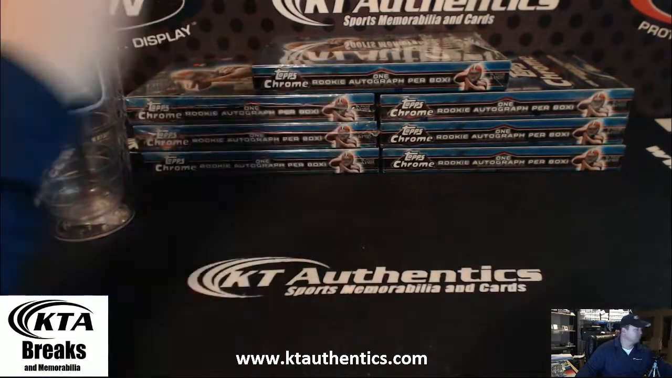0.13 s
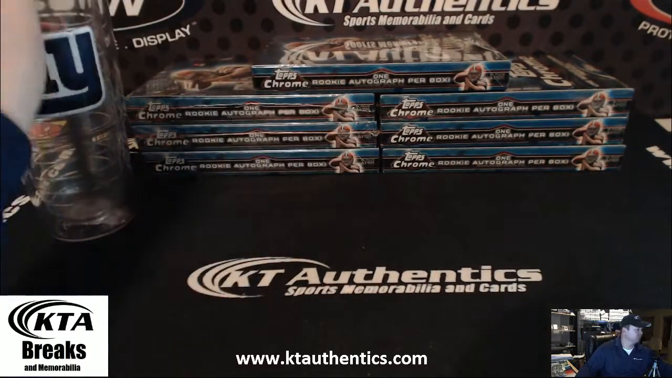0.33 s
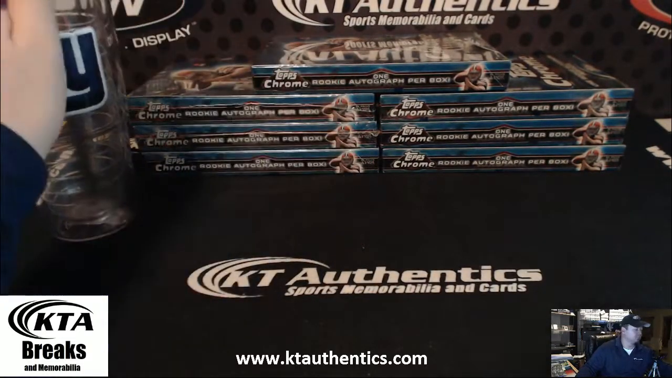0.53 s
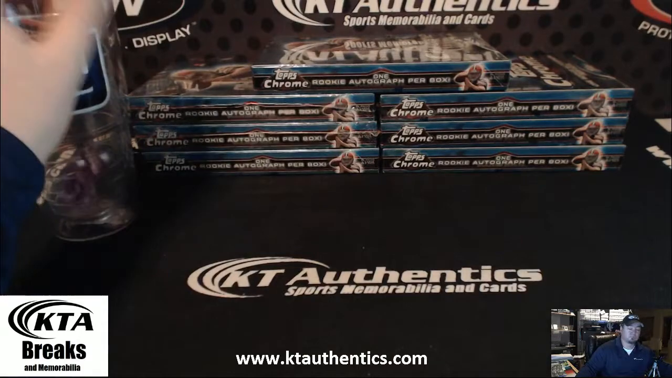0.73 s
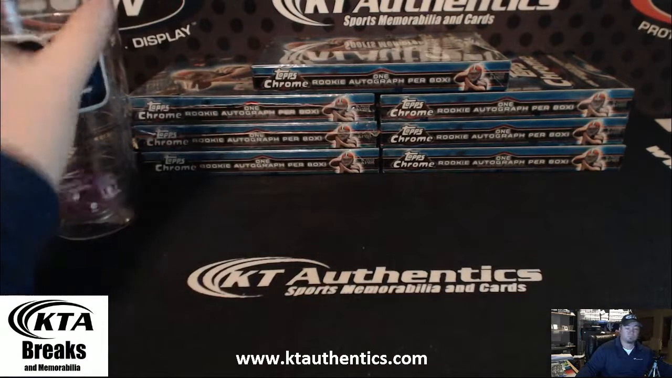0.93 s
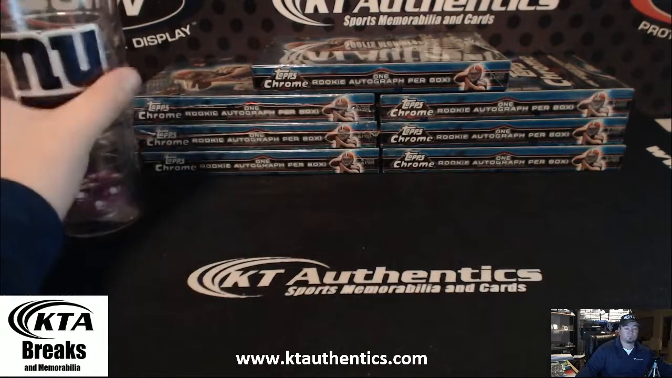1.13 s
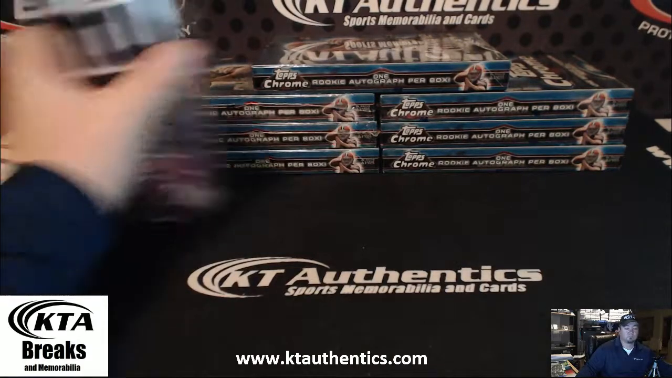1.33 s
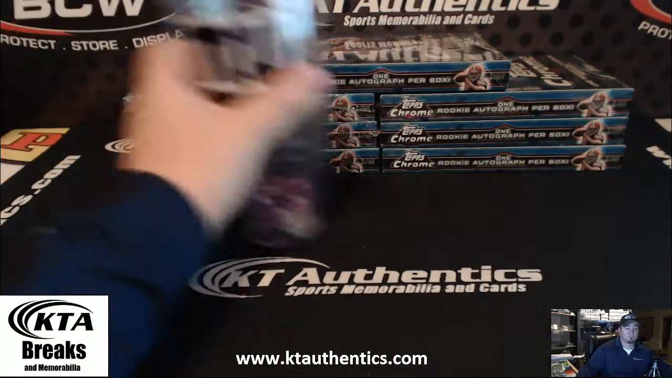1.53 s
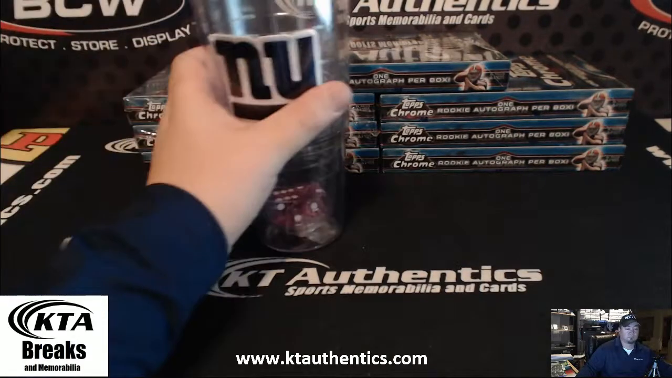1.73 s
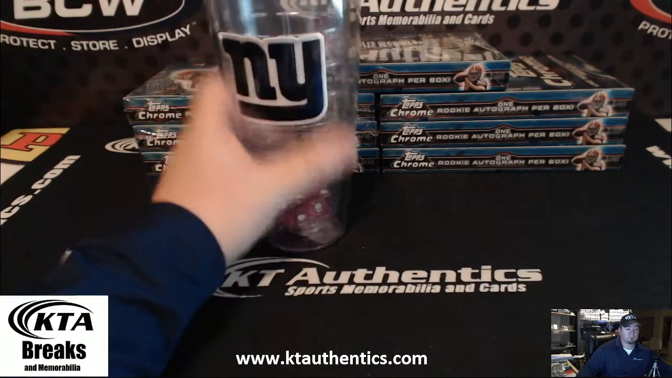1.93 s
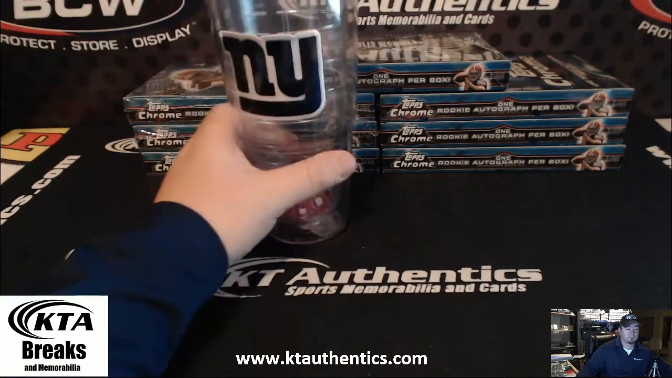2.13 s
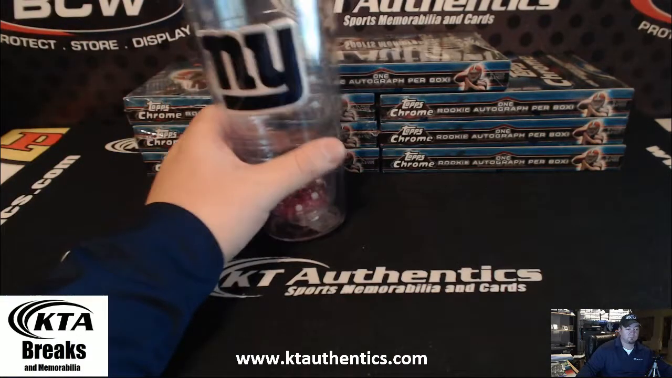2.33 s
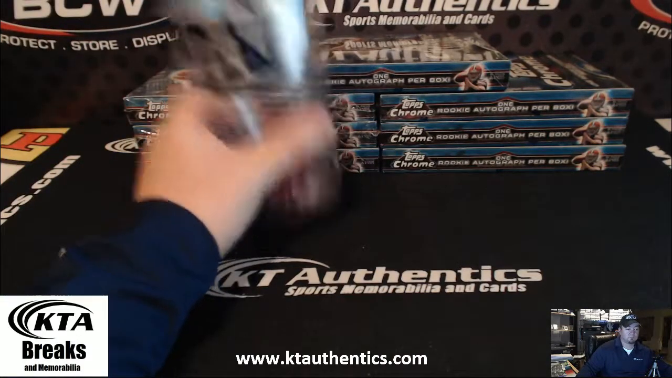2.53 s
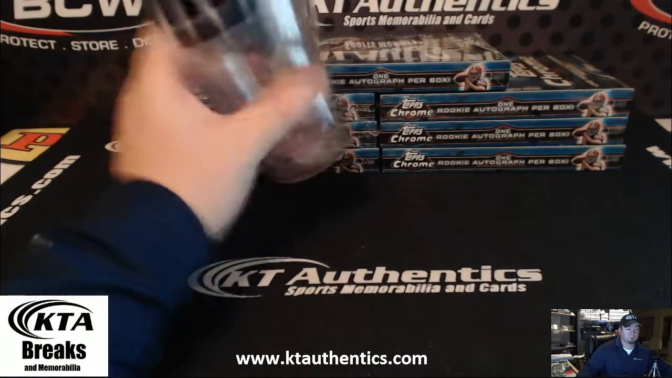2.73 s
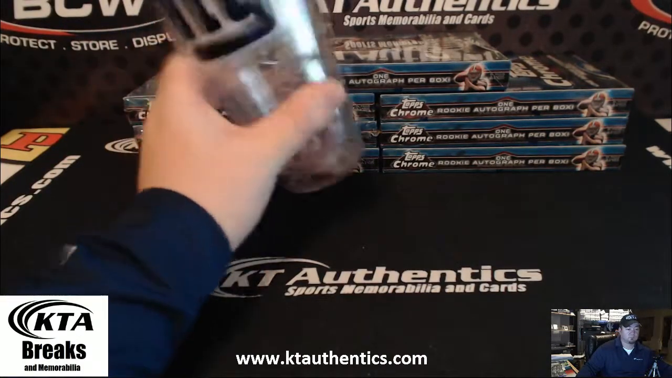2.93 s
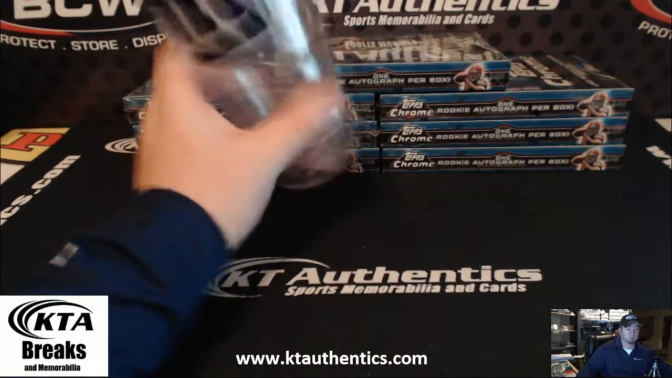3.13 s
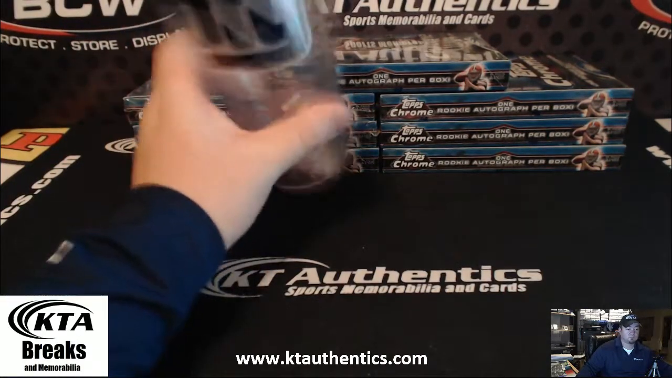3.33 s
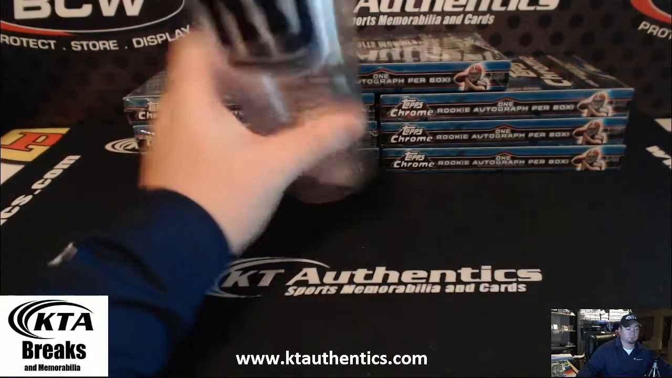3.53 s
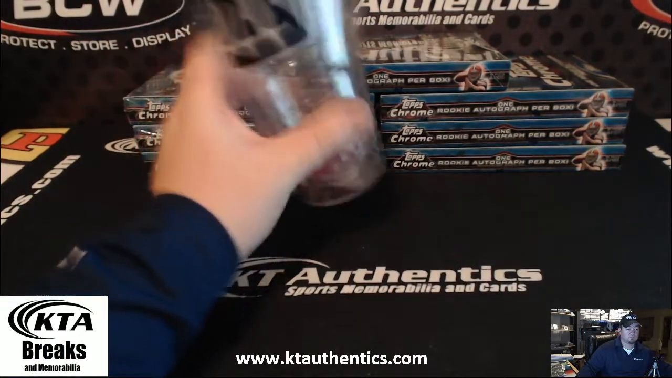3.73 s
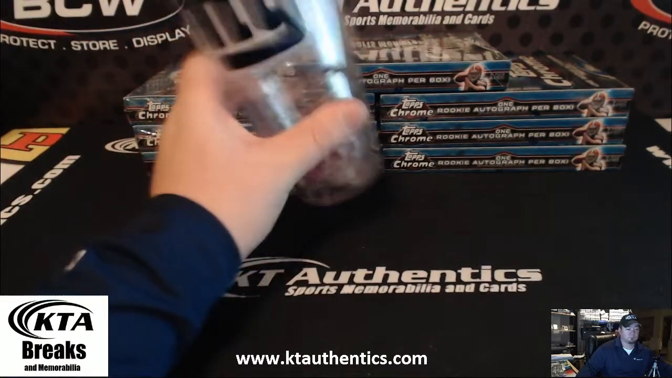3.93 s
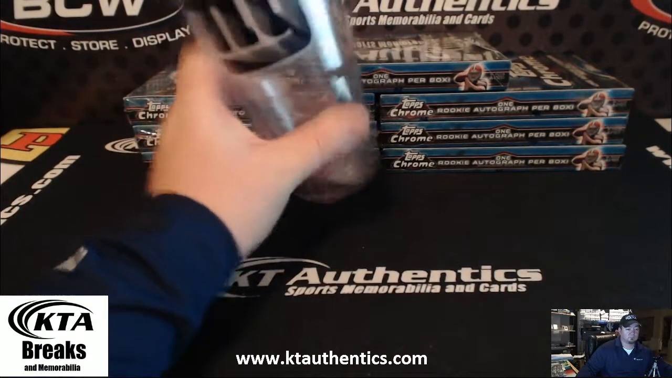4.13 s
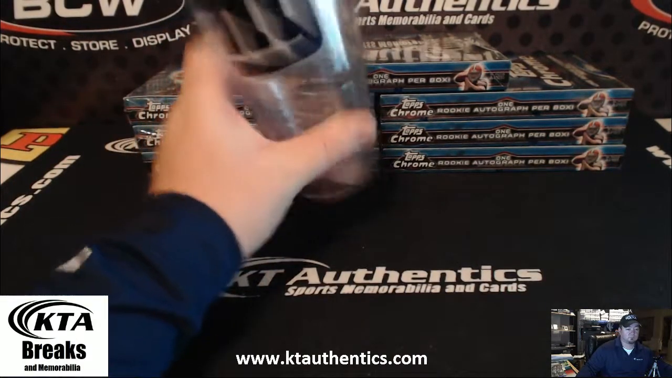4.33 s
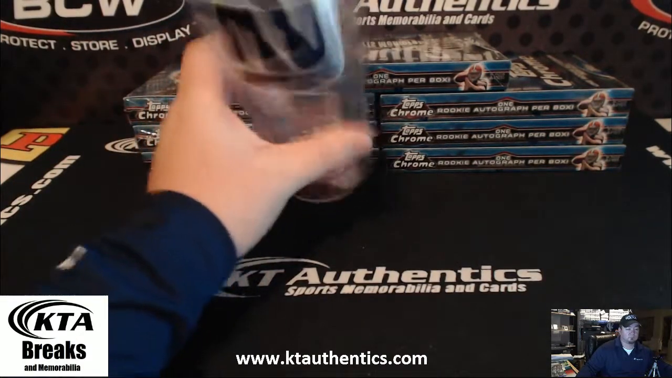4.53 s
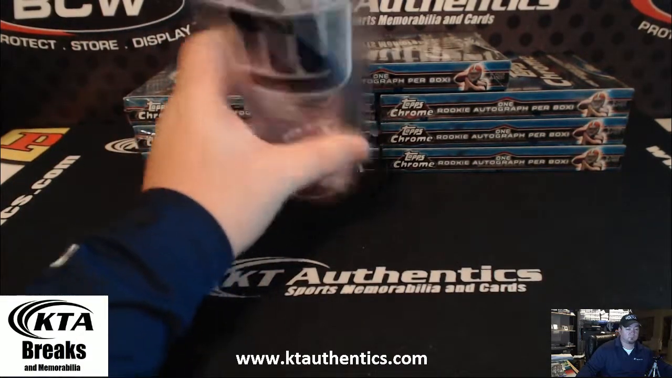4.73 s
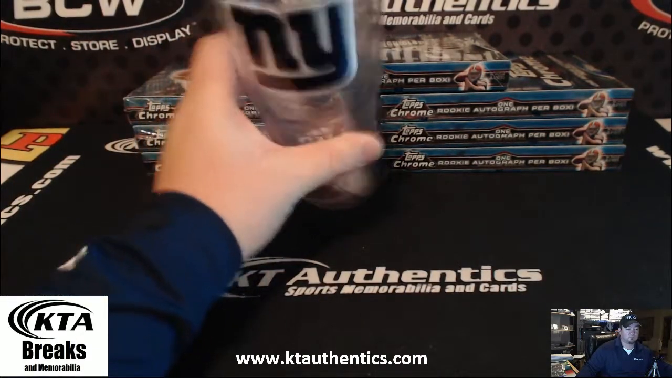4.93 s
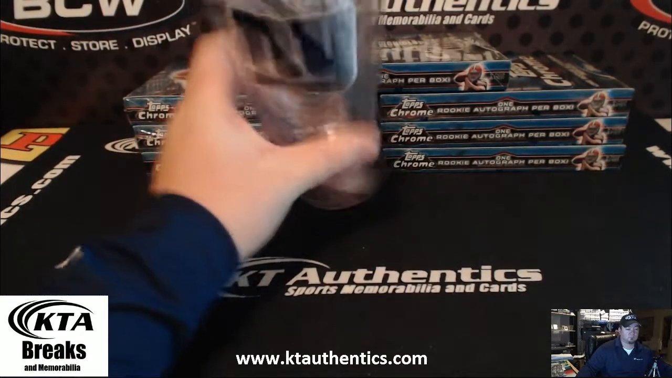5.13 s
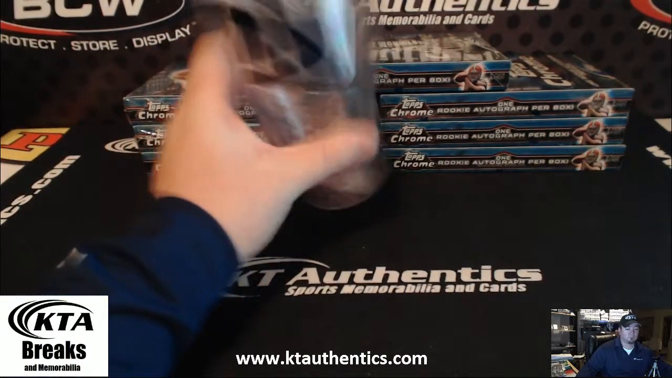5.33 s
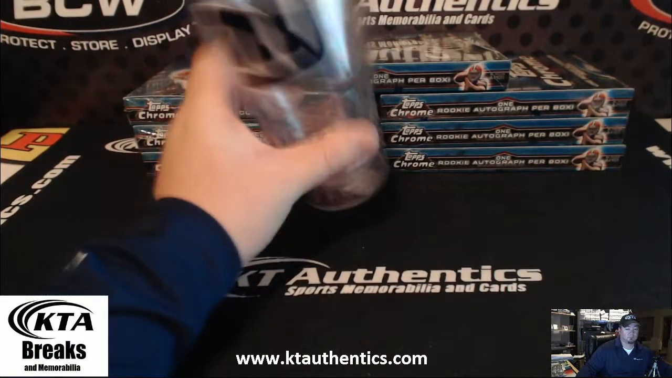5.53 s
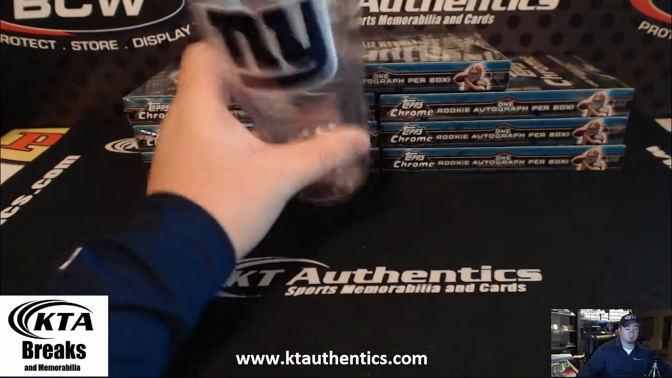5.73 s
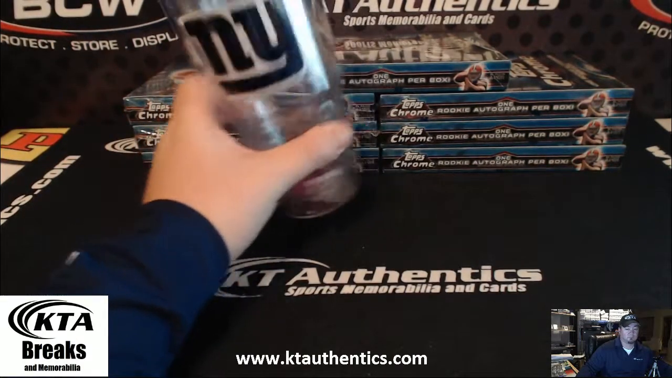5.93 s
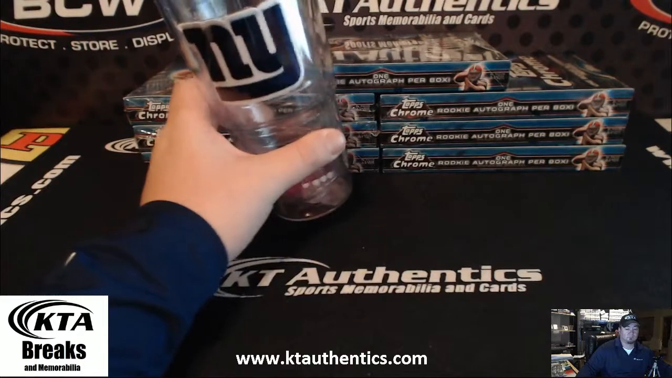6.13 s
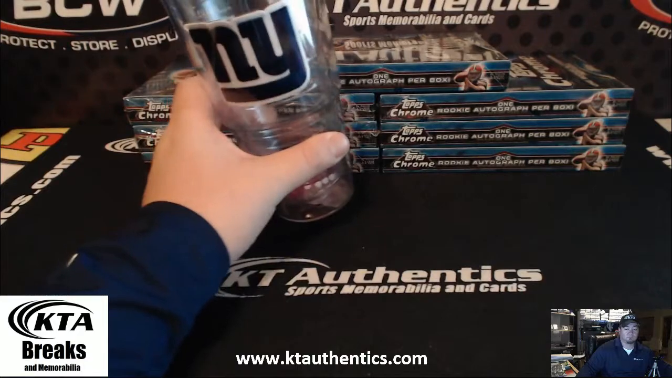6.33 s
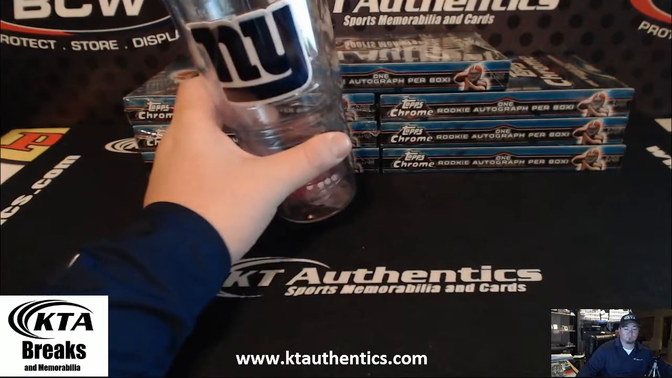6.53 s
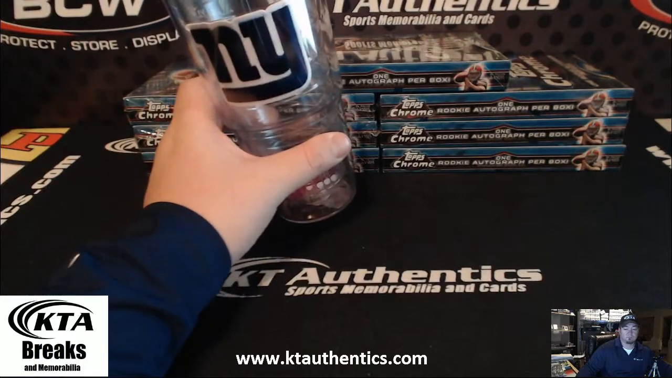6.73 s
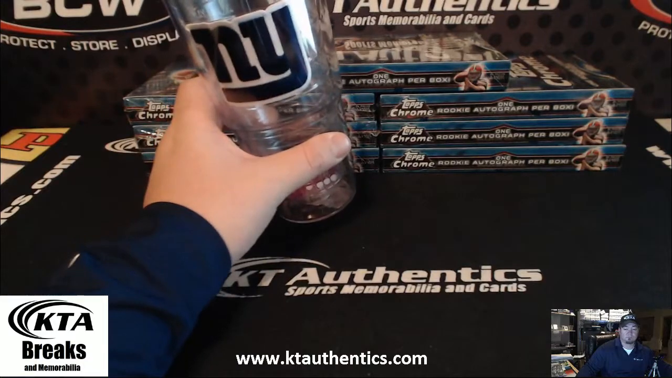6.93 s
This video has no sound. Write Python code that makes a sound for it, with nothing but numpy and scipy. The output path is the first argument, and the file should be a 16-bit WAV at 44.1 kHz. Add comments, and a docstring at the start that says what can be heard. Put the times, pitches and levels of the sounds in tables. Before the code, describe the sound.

In a small room, close to the microphone, dice land sharply in a plastic cup on a table and bounce to rest. A dull, deep bump follows. Then the dice are shaken in the cup, a fast, uneven rattle of hollow knocks and bright clicks over soft table thumps. It is strongest at first and ends after about three seconds, leaving faint hiss and hum.

```python
"""Dice in a plastic tumbler.

Dice drop into a stiff tumbler standing on a table, bounce and settle; then it is shaken hard for
three seconds. Each contact rings modes of the base, the wall and the dice. The table booms softly
under the arm, a small room rings behind, and the nearby microphone clips on the hardest hits."""
import sys
import numpy as np
from scipy import signal
from scipy.fft import rfft, irfft, next_fast_len
from scipy.io import wavfile

SR = 44100
rng = np.random.default_rng(int(sys.argv[2]) if len(sys.argv) > 2 else 0)


def inscribe(sig):
    """Save sig as 16-bit PCM at rate SR to the path in sys.argv[1].

    A 1-D sig is mono; a 2-D sig holds one channel per row.
    Samples are clipped to [-1, 1] before scaling.
    """
    pcm = np.round(np.clip(np.atleast_2d(sig).T, -1, 1) * 32767)
    wavfile.write(sys.argv[1], SR, pcm.astype(np.int16))


N = 308259
CARRY_S = 1.499  # tumbler brought across, between drop and shake

# dice landing in the standing tumbler: (time [s], level [dB], wall over base [dB])
LANDINGS = [(.337, -30.5, -3), (.382, -26, 1.5), (0.427, -31, 1), (.487, -6, 20), (.504, -7, -4.5),
            (.524, -6, 17.5), (.544, -13, -13.5), (.582, -16.5, -3.5), (.618, -12, 18), (.656, -11, 9),
            (0.679, -15.5, -2), (.711, -22.5, -3), (.735, -9, 11), (.755, -16.5, -3), (.810, -17, 2.5),
            (.881, -29.5, 3)]
# heap hitting the shaken tumbler as the hand turns: (time [s], level [dB], wall over base [dB])
HEAP_HITS = [(2.575, -27.5, -4), (2.635, -25, -8), (2.65, -9, 4.5), (2.737, -15.5, 1), (2.807, -10.5, 1),
             (2.88, -25, -15), (2.894, -13.5, -8), (2.93, -18.5, 8), (2.953, -15.5, 10), (2.972, -19.5, -8),
             (3.055, -13.5, -4), (3.122, -15.5, 3), (3.226, -13, 2), (3.285, -13.5, 8.5),
             (3.377, -15, -5.5), (3.454, -20, -1), (3.47, -11, 3.5), (3.553, -15, -3), (3.636, -12.5, 1.5),
             (3.715, -14.5, -3.5), (3.808, -14, 3.5), (3.82, -28, -3), (3.91, -17, -5), (3.976, -14.5, 2.5),
             (4.074, -19, -6), (4.167, -17.5, -6), (4.333, -20.5, -2), (4.452, -22, -5), (4.521, -18, -1),
             (4.589, -20.5, -6), (4.625, -19, -4), (4.703, -16.5, -3), (4.802, -22.5, -8),
             (4.898, -18, -5.5), (4.967, -20.5, -3), (5.063, -21.5, 5), (5.155, -21.5, -6),
             (5.249, -12.5, -3), (5.348, -22, -10), (5.368, -19.5, -11), (5.435, -28, 12), (5.534, -24, -8),
             (5.555, -22, -6), (5.652, -24, 0)]
# die against die: (time [s], level [dB], edge crack over clack [dB])
DIE_HITS = [(.337, -46.5, -1), (.382, -28.5, -1.5), (0.424, -34, -11), (.487, -4, -4), (0.522, -8.5, -17),
            (.618, -21, -19), (0.811, -27, -12.5), (2.554, -26.5, -9.5), (2.575, -28, -8),
            (2.737, -21.5, -3), (2.808, -16.5, -19), (2.82, -26.5, 4), (2.895, -26.5, 5),
            (2.971, -24.5, 2.5), (3.21, -23, -19), (3.285, -22, -21), (3.313, -18.5, 0),
            (3.392, -16.5, -18), (3.563, -24.5, 4), (3.91, -29.5, 9.5), (3.945, -23, -11),
            (4.048, -27, -13), (4.074, -36.5, 6), (4.676, -20.5, -16), (4.768, -25, -25),
            (4.803, -39.5, 13.5), (5.003, -31, -12), (5.208, -25, -13), (5.4, -16, -14),
            (5.435, -26.5, -11), (5.604, -22.5, -18)]
# a die rolling along the wall: (start [s], end [s], level [dB])
ROLLS = [(4.216, 4.335, -36.5), (4.459, 4.505, -35), (4.975, 5.07, -32), (5.409, 5.47, -35),
         (5.557, 5.6, -31.5)]
# vigour of the shaking: (time [s], level [dB])
EFFORT = [(2.65, -0.5), (3.6, 1.5), (4.0, -3.5), (4.25, -6), (4.7, -2.5), (5.62, -3.5)]
# arm's push on the table: (time [s], level [dB])
ARM_WEIGHT = [(2.86, -29), (3.2, -31.5), (3.88, -30.5), (4.1, -39), (4.4, -36.5), (4.76, -27.5), (5.1, -31),
              (6.0, -32.5)]
# tumbler base: (frequency [Hz], level [dB], t60 [s])
BASE_MODES = [(285, -3, 0.01), (377.6, 1.5, 0.068), (523, -3.5, 0.063), (720, -2.5, 0.01)]
# tumbler wall: (frequency [Hz], level [dB], t60 [s])
WALL_MODES = [(1228, 0.5, 0.013), (1318.4, 1.5, 0.056), (1522, -4.5, 0.014), (1845, -7, 0.025)]
# body of a die: (frequency [Hz], level [dB], t60 [s])
CLACK_MODES = [(2775, 6.45, 0.0078), (3414, 2.05, 0.01), (4410, 7.4, 0.0058)]
# hard edges of a die: (frequency [Hz], level [dB], t60 [s])
CRACK_MODES = [(5725, 0, 0.0074), (6610, 3, 0.0034), (8130, -3.5, 0.0015), (12400, -12.5, 0.0013)]
# table top: (frequency [Hz], level [dB], t60 [s])
TABLE_MODES = [(73.34, 3, 0.56), (90.3, -8.5, 0.32), (108.1, -1, 0.29)]
# room reverberation: (band centre [Hz], level [dB], t60 [s])
REVERB_BANDS = [(150, -5, 0.36), (507, -3, 0.5), (1400, -4, 0.57), (5960, -5, 0.54), (13000, 0.5, 0.35)]
# background noise: (frequency [Hz], relative density [dB])
ROOM_TONE_SPECTRUM = [(30, -1), (70, -1), (120, 0.5), (200, -7), (450, -11.5), (750, -9.5), (950, -17.5),
                      (2200, -22), (3300, -34.5), (9000, -35.5), (11000, -42), (16000, -47)]


def shake(edge_db_per_db=1.5):
    """Dice thrown about the shaken tumbler; edges crack more sharply with effort."""
    hit_effort_db = effort_db(np.array(HEAP_HITS)[:, 0])
    main = knocks(HEAP_HITS, clack_db=-14.5, crack_db=-15.5 + edge_db_per_db * hit_effort_db)
    leaders = neighbours(main, -0.0083, -0.00196, softer_db=-11.5, spread_db=0.0, count=1)
    # followers hit other dice more than the tumbler
    followers = neighbours(main, .005, .024, softer_db=[-14.0, -12.5, -7.5, -6.0], spread_db=3.5, count=2)
    meetings = clacks([row for row in DIE_HITS if row[0] > CARRY_S], base_db=-2.5, wall_db=0.0)
    loose = tumbling(levels_db=[-27.5, -26.0, -39, -48.5], effort_db_per_db=[0.42, 0.95, 0.59, 0.89])
    rolls = clacks(rolling(), base_db=-0.5, wall_db=0.5)
    hits = np.vstack([main, leaders, followers, meetings, loose, rolls])
    return dice(hits, WALL_MODES, wall_chatter=1.0, wall_top_hz=2240)


def drop(side_modes_db=-13.0):
    """Dice land in the tumbler; standing free, its wall rings mostly in the main mode."""
    strongest_db = max(db for hz, db, t60 in WALL_MODES)
    wall_modes = [(hz, db + side_modes_db * (db < strongest_db), t60) for hz, db, t60 in WALL_MODES]
    landings = knocks(LANDINGS, clack_db=-17.5, crack_db=-23)
    meetings = clacks([row for row in DIE_HITS if row[0] < CARRY_S], base_db=-12, wall_db=-16)
    return dice(np.vstack([landings, meetings]), wall_modes, wall_chatter=0.026, wall_top_hz=1870)


def knocks(rows, clack_db, crack_db):
    """Die on tumbler: the landing spot divides the blow between base and wall. Returns hits."""
    s, db, tilt_db = np.transpose(rows)
    return np.column_stack([s, db - tilt_db / 2, db + tilt_db / 2, db + clack_db, db + crack_db])


def clacks(rows, base_db, wall_db):
    """Die on die: part of the blow passes to the tumbler. Returns hits."""
    s, db, edge_db = np.transpose(rows)
    return np.column_stack([s, db + base_db, db + wall_db, db, db + edge_db])


def neighbours(hits, earliest_s, latest_s, softer_db, spread_db, count):
    """The heap is loose: softer hits land around each main one."""
    others = np.repeat(hits, count, axis=0)
    others[:, 0] += rng.uniform(earliest_s, latest_s, len(others))
    others[:, 1:] += np.array(softer_db) + spread_db * rng.standard_normal(others[:, 1:].shape)
    return others


def tumbling(levels_db, effort_db_per_db, per_s=60, spread_db=1.5, flight_s=.03, flight_db=-1.5):
    """Light hits that rise with effort and dip before each main blow, when most dice are airborne."""
    s = np.arange(EFFORT[0][0], EFFORT[-1][0], 1 / per_s)
    s = s + rng.uniform(0, 1 / per_s, len(s))
    wait_s = np.array(HEAP_HITS)[:, 0] - s[:, None]
    in_air = ((wait_s > 0) & (wait_s < flight_s)).any(axis=1, keepdims=True)
    db = np.array(levels_db) + np.outer(effort_db(s), effort_db_per_db) + flight_db * in_air
    return np.column_stack([s, db + spread_db * rng.standard_normal(db.shape)])


def rolling(ticks_per_s=66, edge_db=-19, spread_db=1.0):
    """A rolling die ticks once per face. Columns as DIE_HITS."""
    return [(s + rng.uniform(0, .5) / ticks_per_s, db + spread_db * rng.normal(), edge_db)
            for start_s, end_s, db in ROLLS for s in np.arange(start_s, end_s, 1 / ticks_per_s)]


def effort_db(times_s):
    """Vigour of the shaking at these times."""
    return np.interp(times_s, *np.transpose(EFFORT))


def dice(hits, wall_modes, wall_chatter, wall_top_hz):
    """Each hit rings four parts: (time [s], base [dB], wall [dB], clack [dB], crack [dB])."""
    s, base_db, wall_db, clack_db, crack_db = np.transpose(hits)
    base = blows(s, base_db, BASE_MODES, bandpass(193, 1016),
                 chatter_s=0.0041, chatter=0.43, spread_db=2.5, detune=0.0095)
    wall = blows(s, wall_db, wall_modes, bandpass(1150, wall_top_hz),
                 chatter_s=0.0033, chatter=wall_chatter, spread_db=6.0, detune=0.0054)
    clack = blows(s, clack_db, CLACK_MODES, bandpass(1100, 4830),
                  chatter_s=0.0019, chatter=2.2, spread_db=4.5, detune=0.056)
    crack = blows(s, crack_db, CRACK_MODES, bandpass(2700, 11600),
                  chatter_s=0.0024, chatter=6.0, spread_db=2.0, detune=0.052)
    return base + wall + clack + crack


def empty_knock(at_s=.282, base_db=-21, wall_db=-25, base_hz=508, base_t60_s=0.15):
    """Light hollow knock on the empty tumbler, with no dice to damp it."""
    band = bandpass(460, 1840)
    base = blows([at_s], [base_db], [(base_hz, 0, base_t60_s)], band)
    wall = blows([at_s], [wall_db], [WALL_MODES[1]], band)
    return base + wall


def blows(times_s, levels_db, modes, band, **touch):
    """All contacts on one part, laid out in time."""
    out = np.zeros(N)
    for s, db in zip(times_s, levels_db):
        sound = contact(modes, band, **touch)
        start = int(s * SR)
        out[start:start + len(sound)] += from_db(db) * sound[:N - start]
    return out


def contact(modes, band, chatter_s=0.0023, chatter=0, spread_db=0, detune=0, onset_s=0.0078):
    """An impulse and a brief swell of chatter drive the modes; normalised over the onset."""
    t = np.arange(SR // 10) / SR
    grit = rng.standard_normal(len(t)) * np.sqrt(t) * np.exp(-t / chatter_s)
    force = chatter * grit / np.linalg.norm(grit)
    force[0] += 1
    sound = np.zeros(len(t))
    # level and pitch vary with the landing spot; adjacent modes swing in opposite senses
    for k, (hz, db, t60_s) in enumerate(modes):
        gain = (-1) ** k * from_db(db + spread_db * rng.normal())
        sound += gain * ring(force, hz * (1 + detune * rng.normal()), t60_s)
    sound = signal.sosfilt(band, sound)
    onset_power = np.average(sound ** 2, weights=np.exp(-(t / onset_s) ** 2))
    return sound / np.sqrt(2 * onset_power)


def ring(force, hz, t60_s):
    """One damped mode; a unit impulse rings at amplitude 1."""
    radius, angle = from_db(-60 / (t60_s * SR)), 2 * np.pi * hz / SR
    pole_real = radius * np.cos(angle)
    return signal.lfilter([1, -pole_real], [1, -2 * pole_real, radius ** 2], force + 1e-18)


def bandpass(low_hz, high_hz):
    """A part radiates poorly outside its own range."""
    return signal.butter(2, [low_hz, high_hz], "band", fs=SR, output="sos")


def from_db(db):
    """Decibels to gain."""
    return 10 ** (np.asarray(db) / 20)


def table(landing_db=-16, landing_db_per_db=.7, thud_db=-19.0):
    """The top booms under dice and arm, with one deeper thud as the tumbler is brought across."""
    landings = [(s, landing_db + landing_db_per_db * db) for s, db, _ in LANDINGS]
    thud = push([(CARRY_S, thud_db)], cutoff_hz=88)
    force = push(np.vstack([landings, arm_swings()]), cutoff_hz=150) + 0.44 * thud
    boom = sum((-1) ** k * from_db(db) * ring(force, hz, t60_s)
               for k, (hz, db, t60_s) in enumerate(TABLE_MODES))
    return ring(thud, hz=38, t60_s=0.18) + signal.sosfilt(bandpass(44, 470), boom)


def arm_swings(start_s=2.86, period_s=.167, slowing_s=.00045, count=19):
    """One push on the table per swing, slowing a little: (time [s], level [dB])."""
    k = np.arange(count)
    s = start_s + period_s * k + slowing_s * k ** 2
    return np.column_stack([s, np.interp(s, *np.transpose(ARM_WEIGHT))])


def push(rows, cutoff_hz):
    """Padded blows: low-passed impulses from (time [s], level [dB])."""
    force = np.zeros(N)
    for s, db in rows:
        force[int(s * SR)] += from_db(db)
    return signal.sosfilt(signal.butter(2, cutoff_hz, fs=SR, output="sos"), force)


def room(source, patterns=6, patterns_per_s=20):
    """The source keeps moving, so reflection patterns crossfade in a cycle."""
    place = np.arange(N) / SR * patterns_per_s
    echoes = np.zeros(N)
    for k in range(patterns):
        nearness = np.clip(1 - np.abs((place - k) % patterns - 1), 0, 1)
        echoes += signal.oaconvolve(source * np.sin(np.pi / 2 * nearness), reflections())[:N]
    return echoes


def reflections(first_echo_s=.005, early_db=11.5, early_decay_s=.009):
    """Dense reflections, strongest from near surfaces, decaying band by band."""
    t = np.arange(next_fast_len(SR * 2 // 3)) / SR
    hz = np.fft.rfftfreq(len(t), 1 / SR)
    white = rfft(rng.standard_normal(len(t)))
    log_centres = np.log([row[0] for row in REVERB_BANDS])
    arrival = (t > first_echo_s) * (1 + from_db(early_db) * np.exp(-t / early_decay_s))
    response = np.zeros(len(t))
    for share, (_, db, t60_s) in zip(np.eye(len(REVERB_BANDS)), REVERB_BANDS):
        fade = arrival * from_db(-60 * t / t60_s)
        band = irfft(white * np.interp(np.log(hz + 1), log_centres, share), len(t))
        response += from_db(db) * band * fade / np.linalg.norm(fade)
    return response


def room_tone(noise_db=-42, hum_hz=119, hum_db=-52.0):
    """Steady rumble and hiss with a faint hum."""
    hz = np.fft.rfftfreq(N, 1 / SR)
    knots_hz, knots_db = np.transpose(ROOM_TONE_SPECTRUM)
    shape_db = np.interp(np.log(hz + 1e-9), np.log(knots_hz), knots_db)
    noise = irfft(rfft(rng.standard_normal(N)) * from_db(shape_db), N)
    hum = np.sin(2 * np.pi * hum_hz * np.arange(N) / SR)
    return from_db(noise_db) * noise / noise.std() + from_db(hum_db) * hum


def scene(drop_room_db=0.15, shake_room_db=0.92):
    """Mono mix; the tumbler stirs the room less standing than lifted."""
    standing = drop() + empty_knock()
    lifted = shake()
    echoes = room(from_db(drop_room_db) * standing + from_db(shake_room_db) * lifted)
    return (standing + lifted + echoes + table() + room_tone())[None]


def record(dry, clip_level=0.66, cutoff_hz=16100):
    """Microphone overload: hard clip, then a steep low-pass."""
    clipped = np.clip(dry, -clip_level, clip_level)
    return signal.sosfilt(signal.ellip(10, .1, 80, cutoff_hz, fs=SR, output="sos"), clipped)


dry = scene()
out = record(dry)
inscribe(out)
```